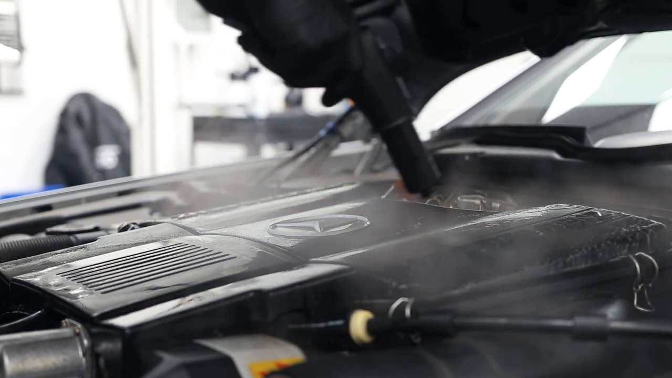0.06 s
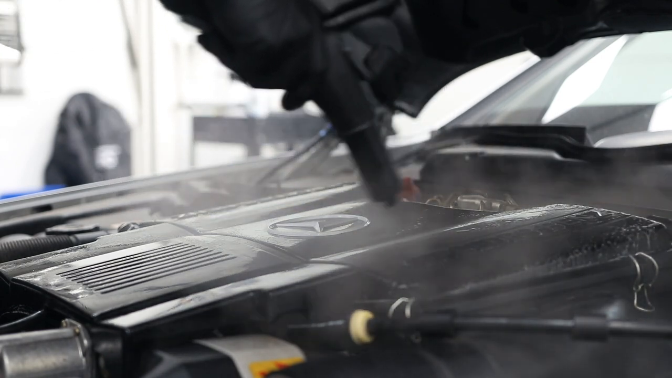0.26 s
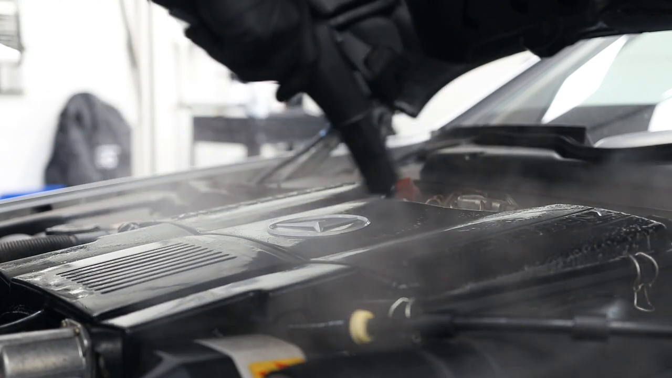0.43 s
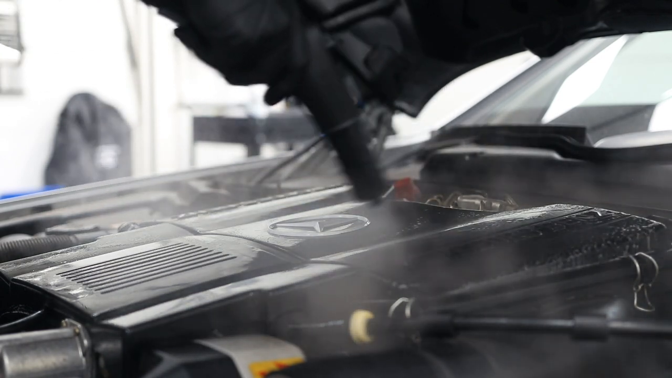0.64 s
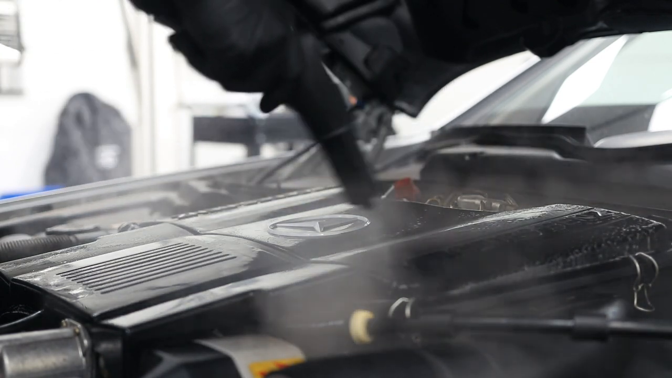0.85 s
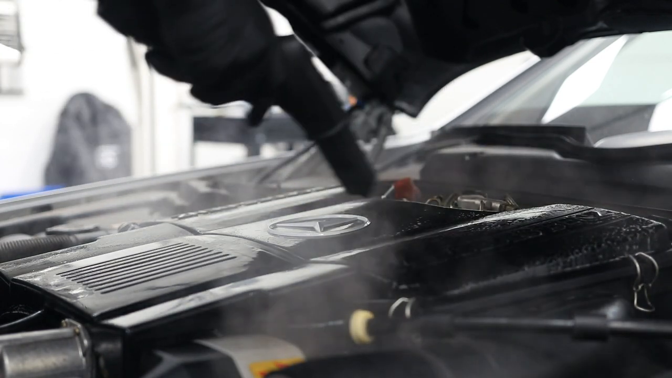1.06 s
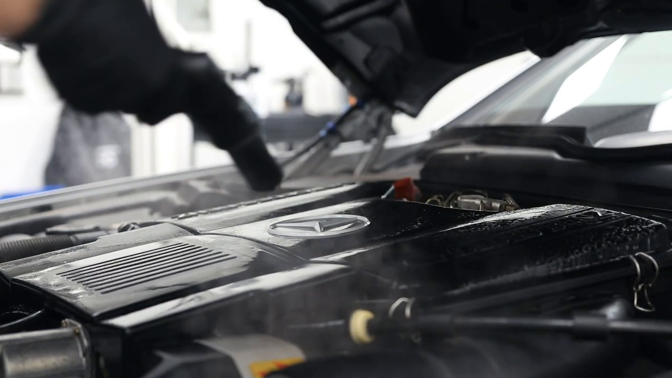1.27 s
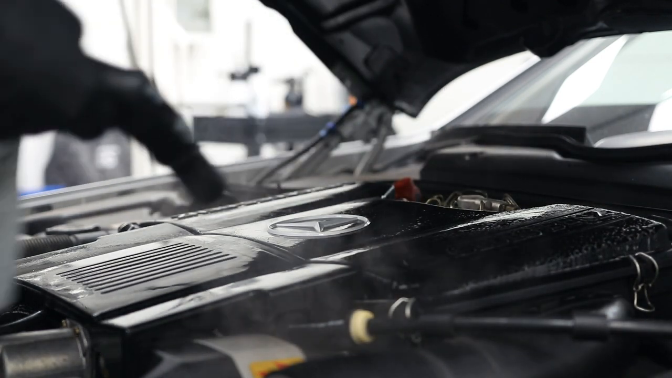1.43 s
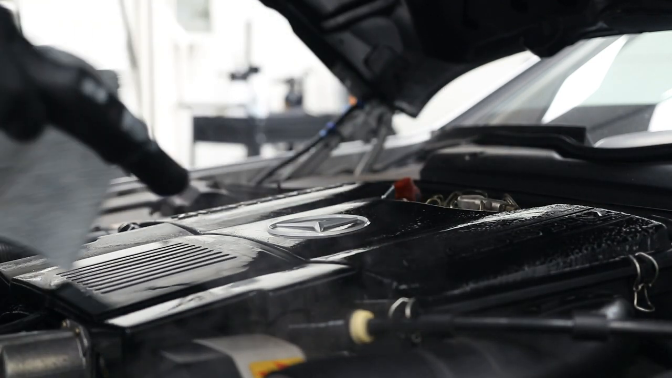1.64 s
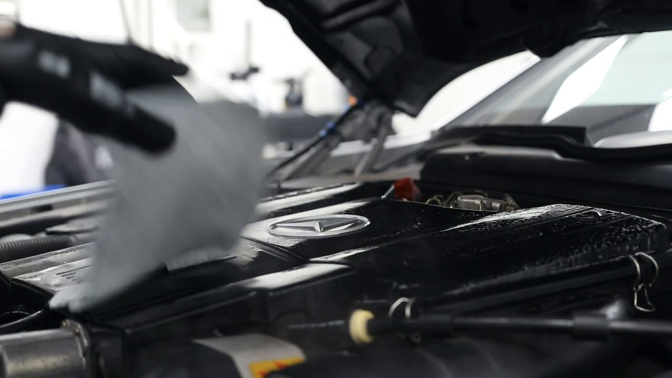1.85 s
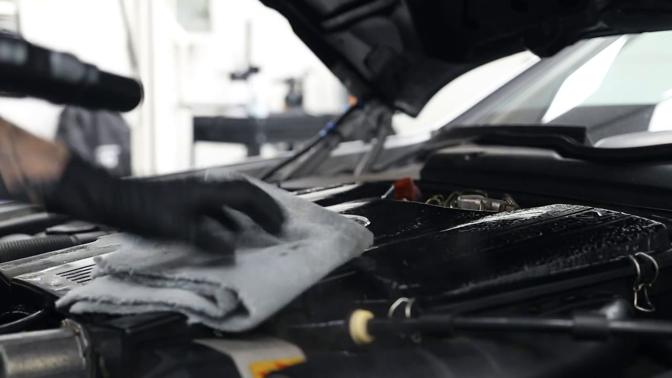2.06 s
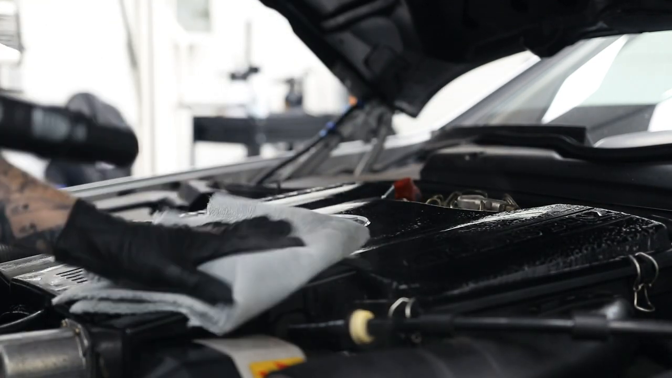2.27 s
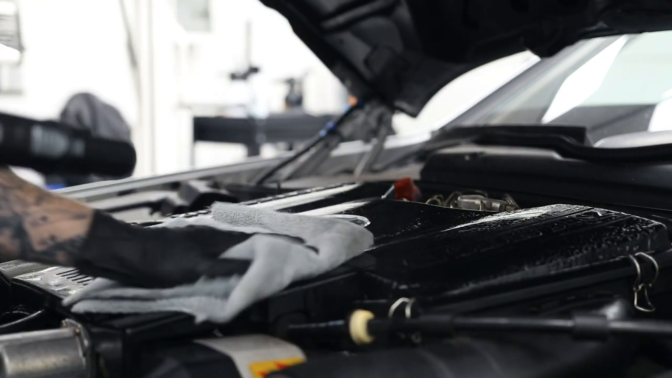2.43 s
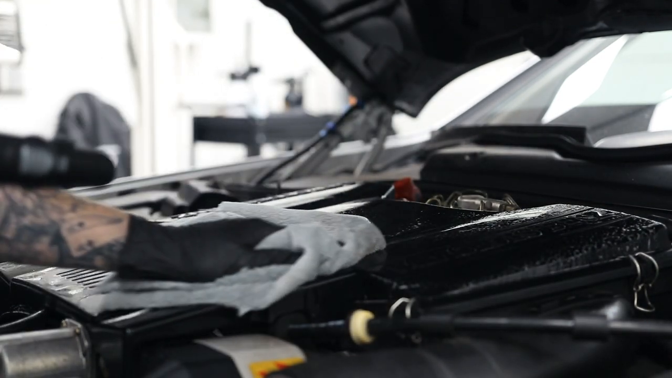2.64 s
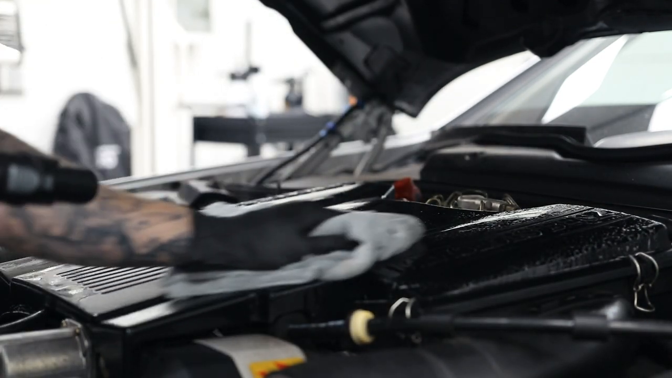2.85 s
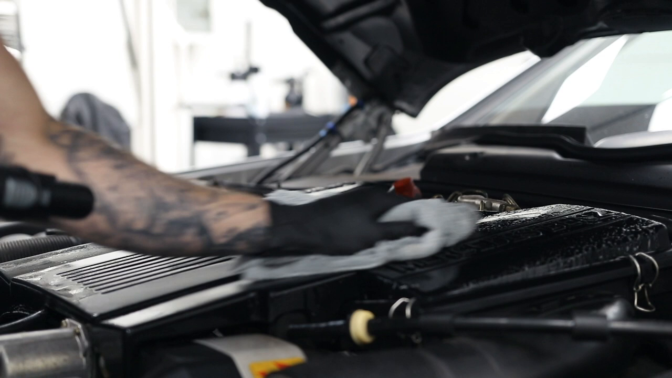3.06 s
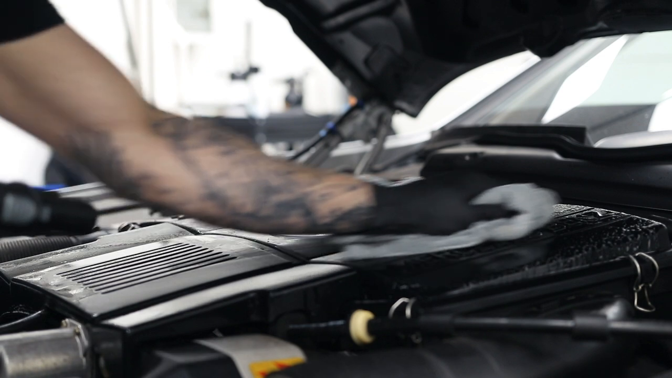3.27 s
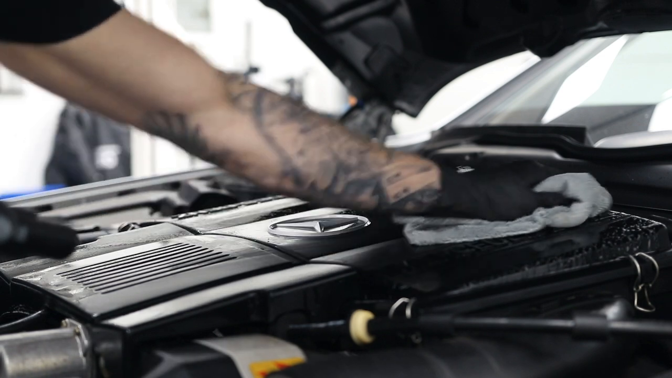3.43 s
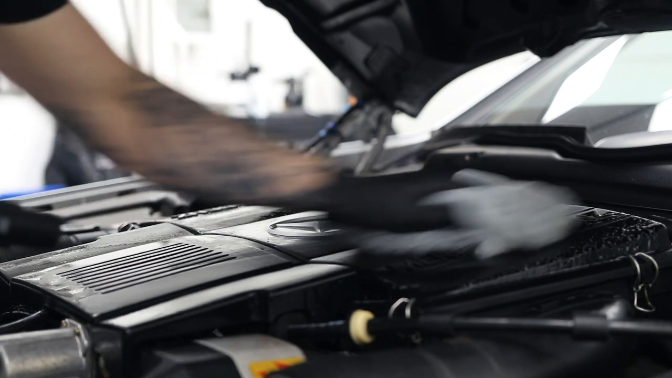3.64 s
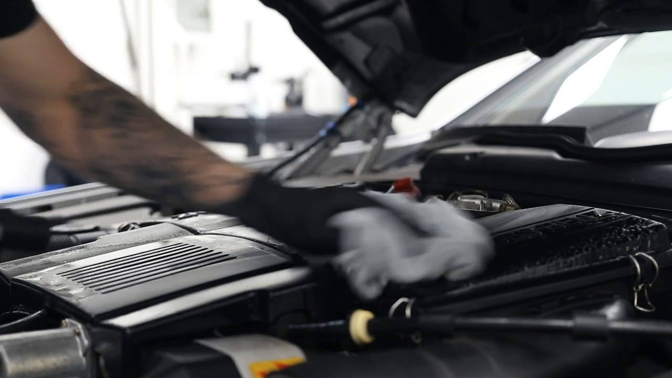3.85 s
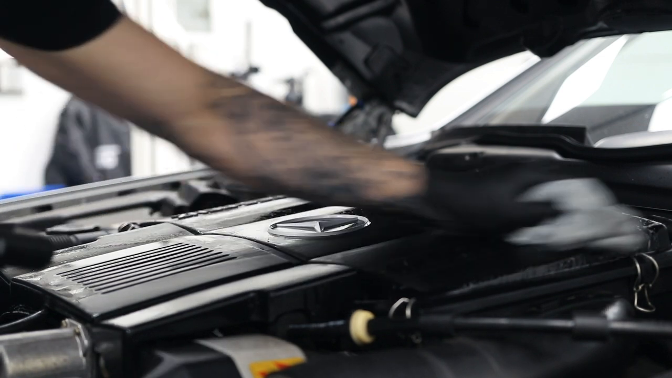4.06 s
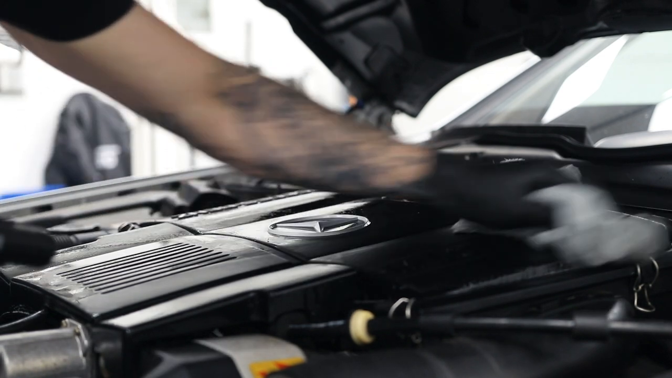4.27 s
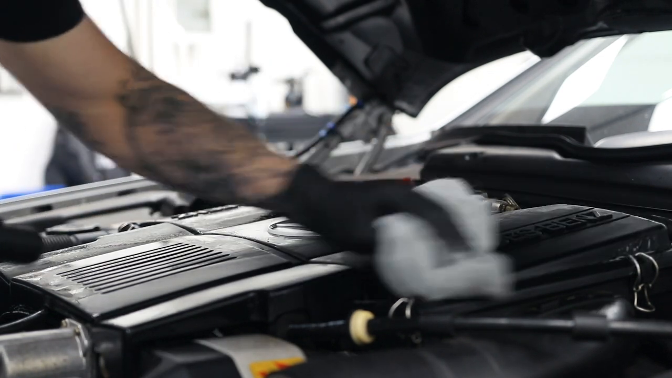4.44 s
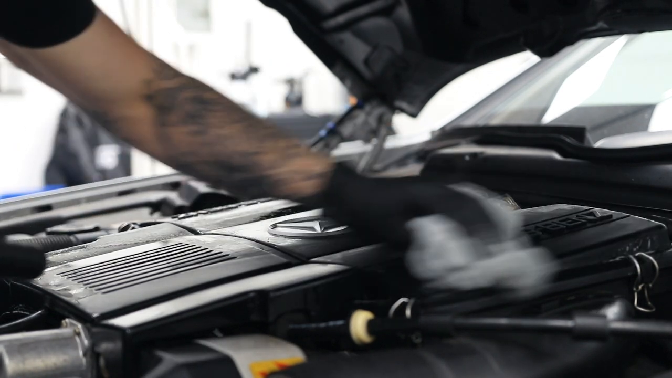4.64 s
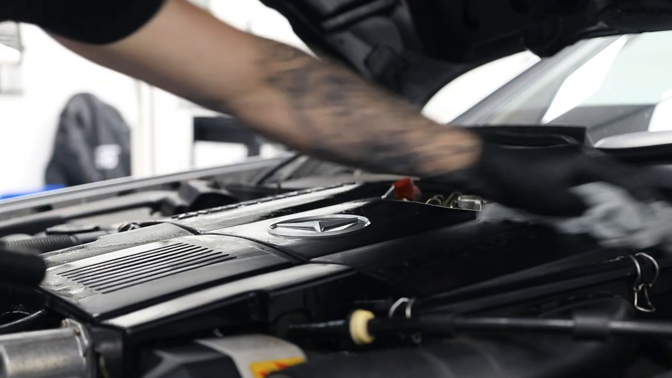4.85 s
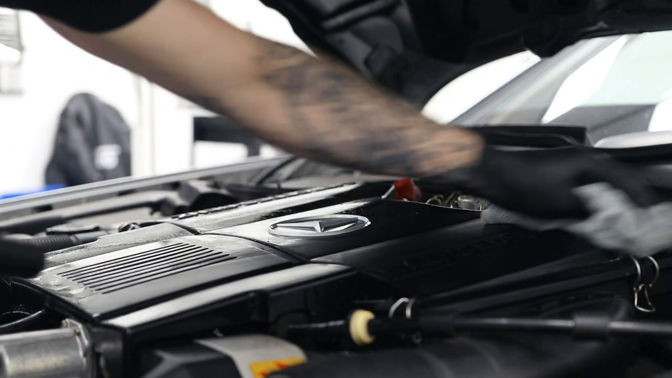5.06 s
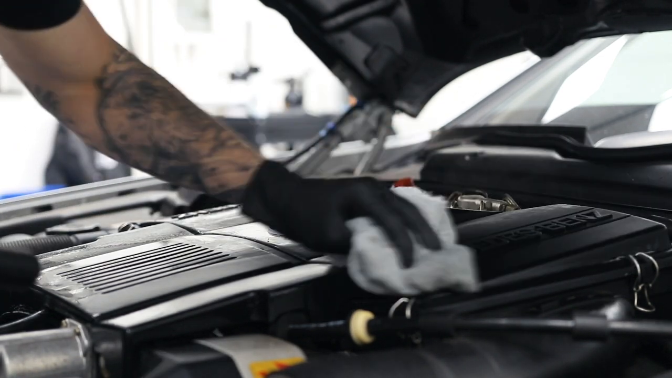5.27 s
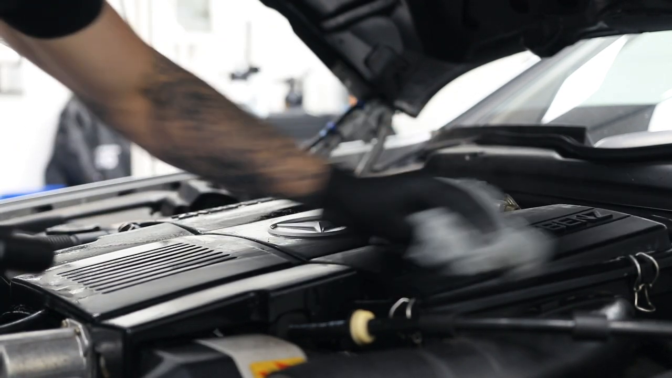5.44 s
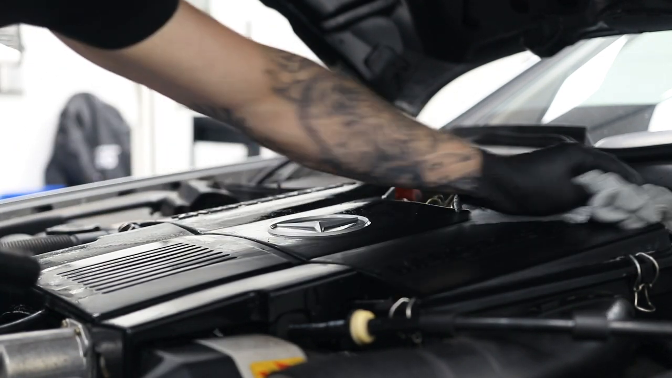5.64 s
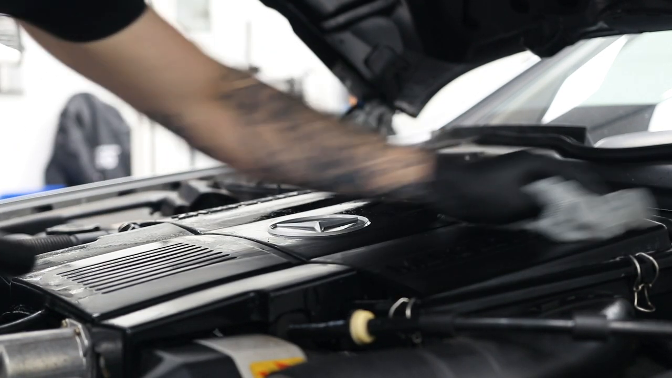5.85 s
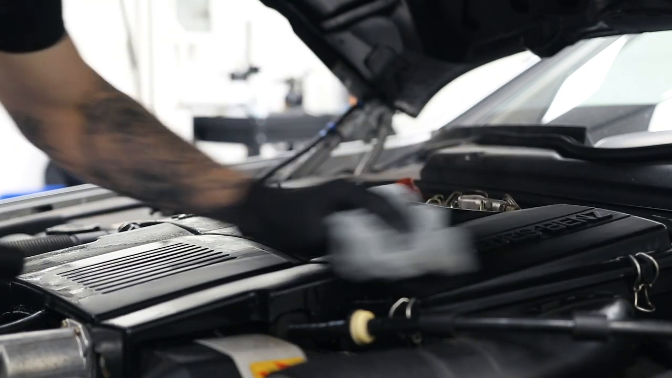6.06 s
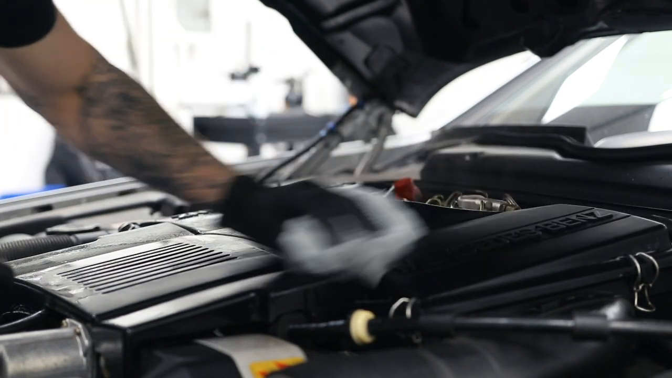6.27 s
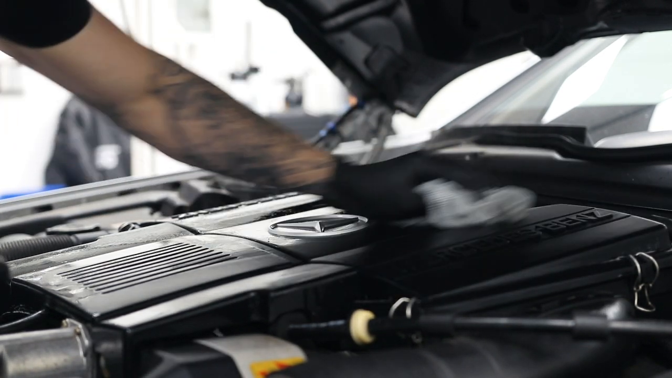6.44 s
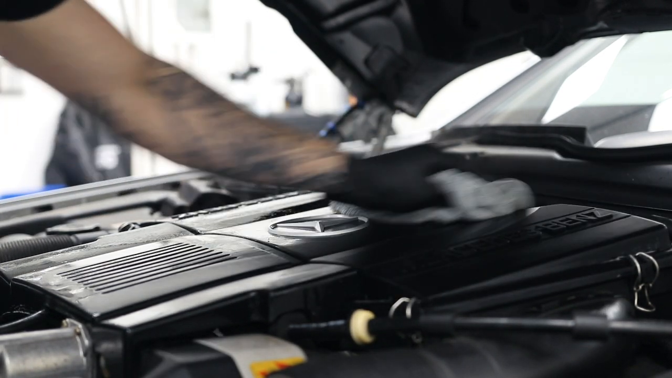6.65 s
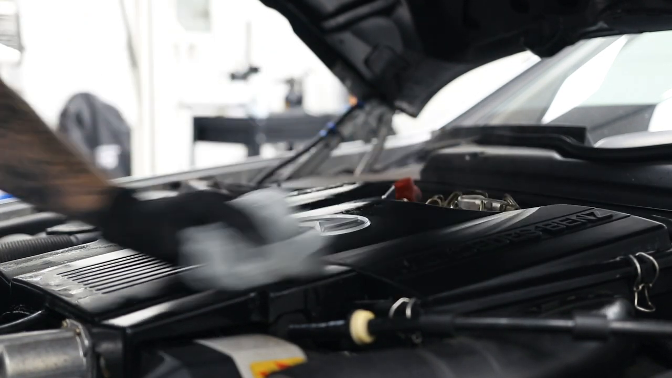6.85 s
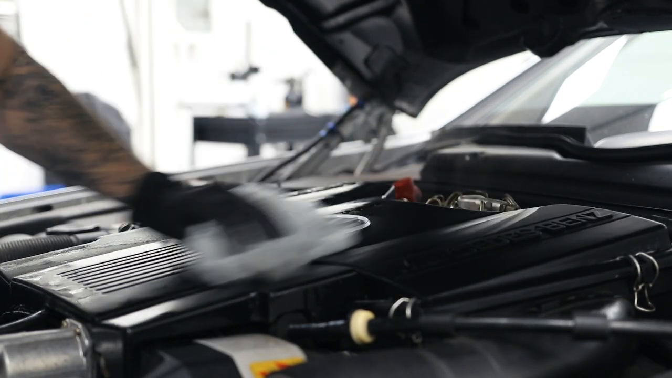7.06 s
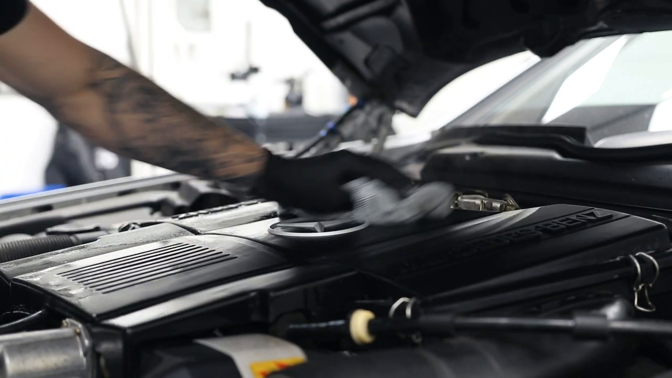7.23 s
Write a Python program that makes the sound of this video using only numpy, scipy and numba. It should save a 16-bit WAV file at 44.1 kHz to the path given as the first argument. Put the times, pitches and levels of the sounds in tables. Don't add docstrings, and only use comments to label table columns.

```python
import sys
import numpy as np
from scipy import signal
from scipy.fft import rfft, irfft
from scipy.io import wavfile
from scipy.ndimage import uniform_filter1d, map_coordinates
from numba import njit

SR = 44100
rng = np.random.default_rng(int(sys.argv[2]) if len(sys.argv) > 2 else 0)


def output_pcm(signal):
    pcm = np.clip(np.atleast_2d(signal).T, -1, 1) * 32767
    wavfile.write(sys.argv[1], SR, np.round(pcm).astype(np.int16))


def decibels_to_gain(level_db):
    exponent = np.asarray(level_db, float) / 20
    return 10 ** exponent


N = 321930
TIME = np.arange(N) / SR
VALVE_SHUT_S = 0.973

# time in seconds, flow in dB, nozzle whistle towards the microphone in dB.
JET_FLOW = [
    (0.0, -30, -8),
    (0.1, -30.5, -8.5),
    (0.19, -31, -4.5),
    (0.56, -31.5, -5),
    (0.684, -32, -3.5),
    (0.7, -31, -7),
    (0.92, -33, -4),
    (0.96, -37, -6),
    (0.97, -38.5, -2),
]
# frequency in Hz, level in dB per Hz.
JET_SPECTRUM = [(35, -76.5), (60, -39.5), (102, -22.5), (201, -20), (291, -15.5), (376, -20.5), (810, -2),
                (1230, -7), (1480, -7), (2980, -8), (3270, -11), (4320, 5.5), (5580, -11.5), (8670, -10.5),
                (15500, -9.5)]
# frequency in Hz, width in Hz, level in dB.
JET_RINGS = [(825, 200, -10), (4190, 240, -8), (5015, 220, 5), (6130, 180, -31.5), (8000, 120, -4.5),
             (8200, 200, 6.5)]
# frequency in Hz, level in dB.
SIGH_SPECTRUM = [(500, 6), (2000, 0), (5000, 3), (9000, -2), (15000, -3)]

# start in seconds, peak in dB, pitch in Hz, treble in dB, ring t60 in seconds.
GUN_BLOWS = [(0.97, -28, 707, -20, 0.097), (1.035, -45.5, 1000, -20, 0.078),
             (1.099, -39.5, 1020, -21, 0.014), (1.181, -35, 1000, -16, 0.044), (1.194, -46, 1010, -11, .05),
             (1.32, -38.5, 1030, -52, 0.047), (1.495, -51, 850, -17, 0.075),
             (1.620, -41, 830, -11.5, 0.041), (1.655, -43.5, 805, -23, 0.037),
             (1.727, -43, 900, -14, 0.047), (1.745, -46, 780, -16, 0.034), (1.84, -47, 906, -19.5, 0.022),
             (1.888, -46, 800, -28, 0.13), (1.951, -53.5, 885, -20, 0.031), (2.062, -61, 760, -18, 0.042),
             (2.21, -59, 576, -12, 0.057), (2.239, -55, 580, -9, 0.027), (2.259, -51, 730, -11, 0.072),
             (2.274, -57, 821, -13, .025), (2.342, -60, 850, -7, 0.062), (2.441, -50.5, 880, -14, 0.084),
             (2.457, -64, 429, 5, .046), (2.582, -41.5, 596, -18, 0.087)]
# start in seconds, peak in dB, pitch in Hz, treble in dB, ring t60 in seconds.
RIB_BLOWS = [(3.078, -63, 220, -24, 0.11), (4.049, -44, 287, -13, 0.074), (4.111, -36.5, 324, -16, .045),
             (5.416, -41, 420, -22, 0.09), (5.525, -32.5, 300, -29, 0.017), (5.568, -35, 477, -20, 0.1),
             (6.125, -39, 570, -25, .037), (6.231, -57, 233, -20, 0.077), (6.31, -39, 500, -14, 0.029),
             (6.837, -43.5, 604, -22, 0.094), (7.115, -45, 900, -10, 0.033), (7.193, -42, 500, -10, 0.024)]
# ratio to the pitch, relative width, level in dB.
SHELL_RINGS = [(0.64, 1.1, 4), (1, 2.26, 12), (1.5, 0.84, -8.5), (2.1, 2.2, -14)]

# start in seconds,
# level in dB, length in seconds, fade t60 in seconds, brightness in dB.
CREAKS = [(1.041, -46, 0.038, 0.29, -40), (1.181, -43.5, 0.018, 0.24, -16),
          (1.316, -58.5, 0.017, 0.26, -19), (1.497, -64.5, 0.011, 0.17, -34),
          (1.62, -54.5, 0.0074, 0.22, -31), (1.658, -65, 0.025, 0.23, -36),
          (1.689, -57, 0.074, 0.21, -20.5), (1.883, -59, .01, 0.22, -40), (2.338, -79, 0.013, 0.066, -30),
          (2.441, -67.5, 0.0078, 0.086, -38), (2.58, -58, 0.006, 0.084, -28)]
# frequency in Hz, width in Hz, level in dB.
GUN_RINGS = [(650, 80, -6), (820, 110, -4), (985, 65, -1), (1100, 60, -8), (1350, 160, -6)]
# frequency in Hz, width in Hz, level in dB.
GUN_UPPER_RINGS = [(1600, 220, 0), (1880, 200, -2), (2250, 350, -2)]
# frequency in Hz, width in Hz, level in dB.
JOINT_RINGS = [(4700, 450, 0), (5900, 400, -6)]
# frequency in Hz, width in Hz, level in dB.
COVER_BOOM = [(104, 46, -13), (280, 145, 1), (540, 280, -2)]

# start in seconds, end in seconds, fibre hiss in dB, gaining speed in seconds,
# stopping in seconds.
TOWEL_STROKES = [(2.06, 2.27, -78.5, 0.042, .07), (2.44, 2.507, -92, .008, 0.045),
                 (2.579, 2.615, -64, 0.0042, 0.062), (1.904, 3.2, -69, 1.2, 0.5),
                 (2.55, 3.531, -62, 0.81, 0.12), (3.482, 3.826, -62.5, 0.17, 0.08),
                 (3.818, 4.214, -61, .16, 0.12), (4.232, 4.56, -61.5, 0.1, 0.12),
                 (4.559, 4.966, -61.5, 0.085, 0.064), (4.987, 5.348, -60, .1, .09),
                 (5.353, 5.729, -60.5, 0.09, 0.072), (5.685, 6.223, -62, 0.22, 0.12),
                 (6.163, 6.589, -59.5, 0.19, 0.096), (6.583, 7.003, -59.5, 0.1, 0.24),
                 (6.918, 7.42, -60, 0.24, .1)]
# time in seconds, rub on the panel above the hiss in dB.
CLOTH_GRIP = [(2.15, -13), (2.44, -9), (2.5, -4), (2.59, -2), (2.68, -2.5), (3.4, -5), (3.68, 1.5),
              (4.02, -2.5), (4.34, 1.5), (4.62, -1.5), (4.88, -3.5), (5.17, 1.5), (5.45, 3.5), (5.68, 3),
              (5.98, 6), (6.4, -1), (6.8, -0.5), (7.15, -3)]
# start in seconds, end in seconds, drumming in dB,
# change by the end in dB, rumble of its weight in dB.
HAND_PRESSES = [(1.692, 1.798, -80.5, -3, 14), (1.926, 2.004, -69.5, -8, 3), (3.054, 3.122, -66, 4, -17),
                (3.233, 3.413, -76.5, 8, -29), (3.4, 3.534, -74.5, -4, 4), (3.59, 3.777, -63, 7, -11),
                (3.938, 4.15, -57, 6.5, -11.5), (4.311, 4.493, -55.5, -3, -14.5),
                (4.632, 4.865, -63.5, -1.5, -15), (4.867, 4.954, -81, 1, 13), (5.08, 5.304, -61.5, -1, -10),
                (5.152, 5.238, -53, 1.5, -36), (5.424, 5.556, -45.5, -0.5, -15.5),
                (5.566, 5.665, -51.5, -0.5, -11.5), (5.837, 6.06, -54.5, 4, -17.5),
                (6.078, 6.162, -60.5, 0, -8), (6.226, 6.25, -53.5, -2, -11), (6.3, 6.444, -60, -1.5, -11),
                (6.637, 6.81, -74, 3, 1), (6.833, 6.882, -59.5, -1, -10), (7.105, 7.313, -61, -1.5, -7)]
# frequency in Hz, level in dB per Hz.
CLOTH_SPECTRUM = [(180, -46), (300, -5), (342, -8.5), (411, -1), (446, -7), (484, -2.5), (835, 6),
                  (1180, -1), (1510, -5), (3230, -10.5), (4280, -10), (5570, -21.5), (15500, -29.5)]
# frequency in Hz, width in Hz, level in dB.
COVER_RINGS = [(166, 39, -24), (231.5, 42, -0.5), (262, 9.6, -0.5), (302, 30, 0), (420, 41, -9.5),
               (525, 120, -1), (780, 98, -8)]
# frequency in Hz, width in Hz, level in dB.
WEIGHT_RINGS = [(123.6, 52, 1), (54.3, 46, -15.5)]

# frequency in Hz, level in dB per Hz.
GARAGE_SPECTRUM = [(15, -20.5), (25, -16), (43, -7), (82, -1), (140, -3), (198, 2.5), (421, -9), (782, -1),
                   (1710, -12), (3530, -12), (4040, -12), (7100, -21.5), (12000, -23), (15500, -30)]
# frequency in Hz, level in dB.
TRACK_SPECTRUM = [(25, -8.5), (80, 6), (400, 8.0), (1000, 4.5), (11700, 3.5), (12000, -40.5)]
# time in seconds, low edge in Hz, high edge in Hz.
TRACK_FLECKS = [
    (.205, 13800, 15700),
    (.205, 10400, 11800),
    (.252, 9600, 11100),
    (.716, 11700, 13200),
    (.716, 6200, 7600),
    (.879, 11000, 13200),
]


def steam():
    flow_db, whistle_db = read(JET_FLOW)
    noise = patchy(JET_SPECTRUM, flicker_db=3.5, rate=9.44, grain_db=-17.5, grain_rate=1000, low_hz=1580, count=30)
    noise = noise + sum(decibels_to_gain(db - 5.0) * svf(noise, float(hz), float(width)) for hz, width, db in JET_RINGS)
    echo_lag_ms = 0.52
    echo = map_coordinates(noise, [np.arange(N) - echo_lag_ms * SR / 1000], order=3)
    roar, jet, top = split(noise + 0.13 * echo, low_hz=3050, high_hz=6330)
    shut = np.exp(-np.maximum(TIME - VALVE_SHUT_S, 0) / 0.0021)
    roar_db = -10.5
    return decibels_to_gain(flow_db) * shut * (decibels_to_gain(whistle_db) * jet + decibels_to_gain(roar_db) * roar + top)


def leak():
    sigh_db, sigh_t60_s = -48.5, 0.38
    whistle_peak_db, whistle_end_s, whistle_t60_s = -75, 1.44, 0.7
    trickle_db = -5
    whistle_db = whistle_peak_db - 60 * np.maximum(TIME - whistle_end_s, 0) / whistle_t60_s
    hiss_db = sigh_db - 60 * np.maximum(TIME - VALVE_SHUT_S, 0) / sigh_t60_s
    hiss_db = np.maximum(hiss_db, trickle_db + whistle_db)
    noise = rng.standard_normal(N)
    hiss = level(colour(noise, SIGH_SPECTRUM))
    whistle = level(steep(noise, 4150, 350)) + level(steep(noise, 4800, 600), -11)
    return (TIME > VALVE_SHUT_S) * (decibels_to_gain(hiss_db) * hiss + decibels_to_gain(whistle_db) * level(whistle))


def knocks():
    span = 8000
    out, t = np.zeros(N + span), TIME[:span]
    for s, peak_db, hz, treble_db, t60 in [*GUN_BLOWS, *RIB_BLOWS]:
        noise = rng.standard_normal(span)
        thud_db = -17.5 + 8 * np.log2(t60 / 0.047)
        fade = np.exp(-np.log(1000) * t / t60)
        push = (t < 0.0002) + 0.14 * noise * fade
        ring = shell(push, hz, sharp=max(hz * t60 / 6.3, 0.7))
        crack = steep(noise * np.exp(-t / 0.0012), 4400, 1500)
        thud = steep(push, 240, 170)
        parts = ((0, ring), (treble_db, crack), (thud_db, thud))
        blow = sum(decibels_to_gain(db) * part / np.abs(part).max() for db, part in parts)
        start = int(s * SR)
        out[start:start + span] += decibels_to_gain(peak_db) * blow
    return out[:N]


def shell(push, hz, sharp):
    return sum(decibels_to_gain(db) * steep(push, hz * ratio, hz * ratio / sharp * width) for ratio, width, db in SHELL_RINGS)


def rattles():
    span = 16000
    out, t = np.zeros(N), TIME[:span]
    for s, db, length, t60, bright_db in CREAKS:
        noise = rng.standard_normal(span)
        slips = noise * np.abs(noise) + 18 * (t == 0)
        shape = np.exp(-np.log(1000) * np.maximum(t - length, 0) / t60)
        upper = decibels_to_gain(bright_db / 2 + 2.0) * modes(slips, GUN_UPPER_RINGS)
        upper = upper + decibels_to_gain(bright_db) * shape ** 1.5 * modes(slips, JOINT_RINGS)
        clatter_db = -5.5 + 0.5543 * (-52 - db)
        clatter = level(steep(steep(slips, 890, 880), 890, 880))
        body = modes(slips, GUN_RINGS) + decibels_to_gain(clatter_db) * clatter
        boom_db = -6.5 + 11.5 * np.log2(0.26 / t60)
        swell = 1 - np.exp(-t / 0.0092)
        boom = decibels_to_gain(boom_db) * swell * modes(slips, COVER_BOOM)
        start = int(s * SR)
        out[start:start + span] += decibels_to_gain(db) * (shape * body + shape ** 0.54 * boom + shape ** 0.92 * upper)
    return out


def swish():
    start_s, end_s = 2.085, 2.23
    sweep = np.clip(np.minimum(TIME - start_s, end_s - TIME) / 0.025, 0, 1)
    return decibels_to_gain(-69.5) * sweep * level(steep(rng.standard_normal(N), 3800, 2100))


def towel():
    fibres = patchy(CLOTH_SPECTRUM, flicker_db=3.0, rate=12, grain_db=-4, grain_rate=1500, low_hz=393, count=20)
    rub, hiss, top = split(fibres, low_hz=1483, high_hz=6500)
    drying_db = 1.26 * (TIME - 4)
    settled_s, settling_s = 2.87, 0.82
    rustle_db = 13 * np.clip((settled_s - TIME) / settling_s, 0, 1)
    top_db = -10.5 + drying_db + rustle_db
    cloth = hiss + decibels_to_gain(read(CLOTH_GRIP)[0]) * rub + decibels_to_gain(top_db) * top

    slips = grains(260, scatter_db=1.2) + 0.67 * rng.standard_normal(N)
    slips = slips * decibels_to_gain(2.5 * walk(40))
    rumble = modes(slips, WEIGHT_RINGS)
    drum = modes(slips, COVER_RINGS)

    out = np.zeros(N)
    speed_law = 1.93
    for start, end, db, gain, stop in TOWEL_STROKES:
        speed = ramp(start, end, gain, stop)
        out += cloth * decibels_to_gain(db) * speed ** speed_law
    lean_s, lift_s = 0.062, 0.12
    for start, end, db, change_db, rumble_db in HAND_PRESSES:
        progress = np.clip((TIME - start) / (end - start), 0, 1)
        hold = ramp(start - lean_s / 2, end + lift_s / 2, lean_s, lift_s)
        weight = decibels_to_gain(db + change_db * progress) * hold ** 2
        out += weight * (drum + decibels_to_gain(rumble_db) * rumble)
    return out


def garage():
    air = patchy(GARAGE_SPECTRUM, flicker_db=4.5, rate=1.6, grain_db=-28.0, grain_rate=240, low_hz=60.9, count=12)
    return level(air, -72.5)


@njit
def walls(x, lags, gain, damp):
    line, soft, out = np.zeros((8, 4096)), np.zeros(8), np.zeros(len(x))
    for i in range(len(x)):
        total = 0.
        for k in range(8):
            soft[k] += (1 - damp) * (gain[k] * line[k, (i - lags[k]) & 4095] - soft[k])
            total += soft[k]
        out[i] = total
        for k in range(8):
            line[k, i & 4095] = x[i] + soft[k] - total / 4
    return out


def patchy(points, flicker_db, rate, grain_db, grain_rate, low_hz, count):
    source = rng.standard_normal(N) + decibels_to_gain(grain_db) * grains(grain_rate, scatter_db=2.0)
    centres = np.geomspace(low_hz, 15000, count)
    width = centres[1] / centres[0] - 1
    flicker = np.zeros(N)
    for hz in centres:
        flicker += (decibels_to_gain(flicker_db * walk(rate)) - 1) * svf(source, hz, hz * width * 0.6)
    return colour(source + flicker, points)


def grains(rate, scatter_db):
    hit = rng.random(N) < rate / SR
    size_db = scatter_db * rng.exponential(size=N)
    return level(hit * decibels_to_gain(size_db) * np.sign(rng.standard_normal(N)))


def walk(rate):
    k = int(SR / rate)
    held = np.repeat(rng.standard_normal(N // k + 1), k)
    return 0.62 * uniform_filter1d(held, k)[:N]


def modes(push, table):
    rings = [decibels_to_gain(db) * level(steep(push, hz, width)) for hz, width, db in table]
    return level(sum((-1) ** k * ring for k, ring in enumerate(rings)))


def steep(x, hz, width):
    hz, width = float(hz), float(width)
    return svf(svf(x, hz, width), hz, width * 3.2)


@njit
def svf(x, hz, width):
    y, b, l = np.empty(len(x)), 0., 0.
    g, k = np.tan(np.pi * hz / SR), width / hz
    for i in range(len(x)):
        v = (b + g * (x[i] - l)) / (1 + g * (g + k))
        b, l, y[i] = 2 * v - b, l + 2 * g * v, k * v
    return y


def colour(x, points):
    hz, db = np.transpose(points)
    f = np.fft.rfftfreq(len(x), 1 / SR) + 1
    return irfft(rfft(x) * decibels_to_gain(np.interp(np.log(f), np.log(hz), db)), len(x))


def band_filter(x, order, hz, kind):
    return signal.sosfilt(signal.butter(order, hz, kind, fs=SR, output="sos"), x)


def split(x, low_hz, high_hz):
    low = band_filter(x, 4, low_hz, "low")
    middle = band_filter(x, 4, [low_hz, high_hz], "band")
    top = band_filter(x, 4, high_hz, "high")
    return level(low), level(middle), level(top)


def level(x, db=0):
    return x * decibels_to_gain(db) / np.sqrt(np.mean(x ** 2))


def read(table):
    s, *columns = np.transpose(table)
    return [np.interp(TIME, s, column) for column in columns]


def ramp(start, end, rise, fall):
    line = np.minimum((TIME - start) / rise, (end - TIME) / fall)
    return np.sin(np.clip(line, 0, 1) * np.pi / 2)


def scene():
    near = steam() + leak() + knocks() + rattles() + swish() + towel()
    room_t60_s, room_damp, room_db = 0.53, 0.43, -27
    lags = rng.integers(700, 2600, 8)
    room = walls(near + 1e-18, lags, decibels_to_gain(-60 * lags / SR / room_t60_s), room_damp)
    return np.tile(near + decibels_to_gain(room_db) * room + garage(), (2, 1))


def low_pass(x):
    return signal.sosfilt(signal.butter(12, 17050, fs=SR, output="sos"), x)


def record(dry):
    side = level(colour(rng.standard_normal(N), TRACK_SPECTRUM), -86)
    for s, low_hz, high_hz in TRACK_FLECKS:
        fleck = level(band_filter(rng.standard_normal(N), 6, [low_hz, high_hz], "band"), -44)
        side = side + fleck * np.cos(np.clip((TIME - s) / 0.018, -1, 1) * np.pi / 2)
    tracks = band_filter(dry, 2, 45, "high") + np.array([side, -side])
    top_cut = signal.ellip(12, 0.2, 80, 15690, fs=SR, output="sos")
    return low_pass(signal.sosfilt(top_cut, tracks))


dry = scene()
out = record(dry)
output_pcm(out)
```